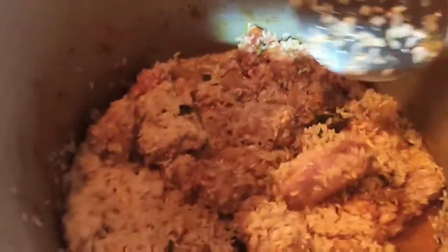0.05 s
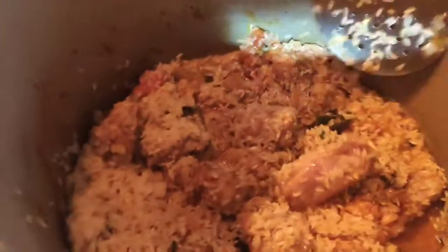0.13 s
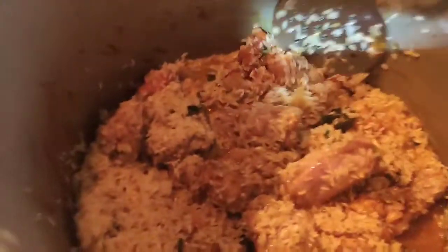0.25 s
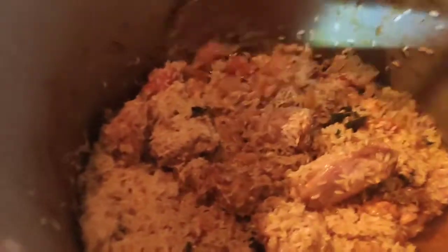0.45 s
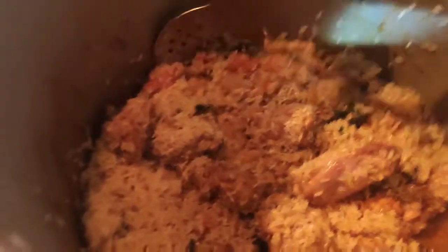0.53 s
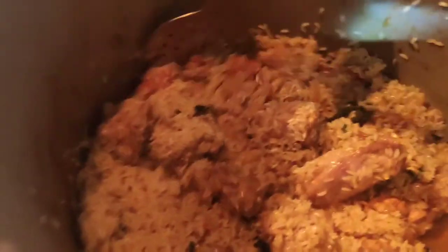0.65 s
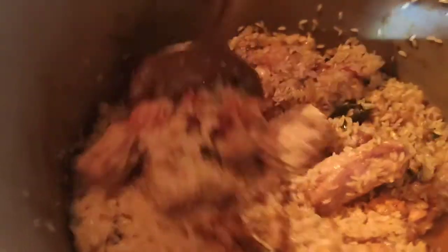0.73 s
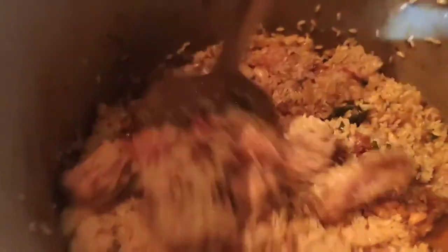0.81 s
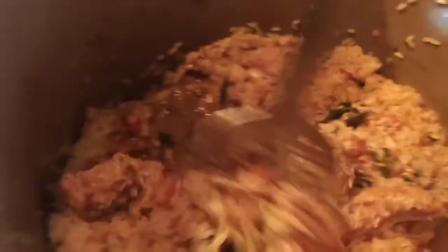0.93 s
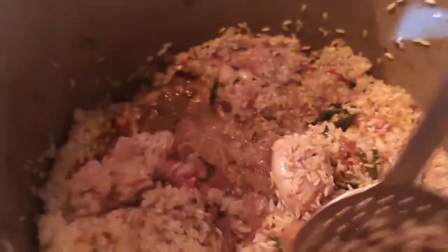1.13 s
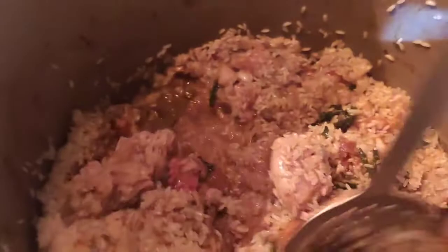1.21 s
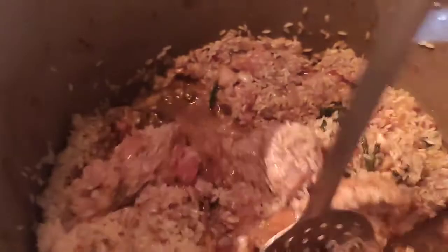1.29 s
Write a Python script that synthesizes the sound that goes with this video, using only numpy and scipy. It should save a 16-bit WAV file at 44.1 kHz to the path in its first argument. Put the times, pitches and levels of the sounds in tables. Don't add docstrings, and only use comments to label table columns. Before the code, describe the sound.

A steel ladle knocks a deep pot of rice, scrapes briefly along its wall, then knocks again and drags through the grains. Close stereo phone pickup in a quietly humming small kitchen.

```python
import sys
import numpy as np
from scipy import signal
from scipy.fft import rfft, irfft
from scipy.io import wavfile
from scipy.ndimage import uniform_filter1d, minimum_filter1d

SR = 44100
rng = np.random.default_rng(int(sys.argv[2]) if len(sys.argv) > 2 else 0)


def boost_factor(decibels):
    exponent = np.asarray(decibels, float) / 20
    return 10 ** exponent


def to_wav(sig):
    pcm = np.clip(np.atleast_2d(sig), -1, 1) * 32767
    pcm = np.round(pcm).astype(np.int16)
    wavfile.write(sys.argv[1], SR, pcm.T)


N = 59535
SIDES = np.array([[1], [-1]])


def rms_one(x):
    return x / np.sqrt(np.mean(x ** 2) + 1e-20)


def at_hz(points, hz):
    p = np.array(points)
    return np.interp(np.log(hz), np.log(p[:, 0] + 1), p[:, 1])


def highpass(x, order, hz):
    return signal.sosfilt(signal.butter(order, hz, "high", fs=SR, output="sos"), x)


def pan(x, db, lag_s=0):
    n = np.arange(N)
    left = np.interp(n - lag_s * SR, n, x)
    return np.array([left * boost_factor(db / 2), x * boost_factor(-db / 2)])


def drift(rate):
    r = np.exp(-80 * np.pi * rate / SR)
    slow = signal.lfilter([1], [1, -2 * r, r * r], rng.standard_normal(N // 40 + 2002))[2000:]
    return np.interp(np.arange(N) / 40, np.arange(len(slow)), rms_one(slow))


def ring(clicks, hz, t60):
    r = boost_factor(-60 / (max(t60, .005) * SR))
    w = 2 * np.pi * hz / SR
    return signal.lfilter([0, np.sin(w)], [1, -2 * r * np.cos(w), r * r], clicks + 1e-18)


def grains(per_s, spread):
    size = boost_factor(spread * np.minimum(rng.exponential(1, N), 4)) * rng.choice([-1, 1], N)
    return rms_one(size * (rng.random(N) < per_s / SR))


def bands(sources, spectrum, shape):
    edges = 25 * 2 ** np.arange(0, 9.6, .5)
    out = 0
    for k, (low, high) in enumerate(zip(edges, edges[1:])):
        hz = np.sqrt(low * high)
        bandpass = signal.butter(2, [low, high], "band", fs=SR, output="sos")
        band = signal.sosfilt(bandpass, sources[k % 2])
        out = out + boost_factor(at_hz(spectrum, hz)) * shape(band, hz)
    return out


def unchanged(band, hz):
    return band


def forest(x, depth_db):
    spacing_hz = 75
    hz = np.arange(N // 2 + 1) * SR / N
    knots = rng.standard_normal(1000)
    peaks_db = depth_db * np.interp(hz / spacing_hz, np.arange(len(knots)), knots)
    return rms_one(irfft(rfft(x) * boost_factor(peaks_db), N))


# (frequency [Hz], density [dB per Hz])
HUM_SPECTRUM = [(15, -42), (25, 3), (75, -2), (193, -0.5), (246, -15), (665, -9), (761, -10), (3080, -22.5),
                (15500, -44.5)]
# (frequency [Hz], likeness [0-1])
HUM_COHERENCE = [(60, 0.063), (240, 0.74), (950, 0.21), (3770, 0.025), (15000, 0.0)]
# (frequency [Hz], left-right [dB])
HUM_BALANCE = [(60, -6), (240, -5), (950, 0.5), (3770, 9), (15000, -1)]


def kitchen_hum():
    level_db, patchy_db = -45.5, 3
    together = drift(5.5)

    def shape(band, hz):
        alike = at_hz(HUM_COHERENCE, hz)
        pair = np.sqrt(1 + alike) * band[0] + np.sqrt(1 - alike) * band[1] * SIDES
        wander_db = patchy_db * (0.74 * together + drift(13.0))
        return pair * boost_factor(wander_db + at_hz(HUM_BALANCE, hz) * SIDES / 2)

    noise = forest(rng.standard_normal((2, 2, N)), 5.5)
    return boost_factor(level_db) * rms_one(bands(noise, HUM_SPECTRUM, shape))


# (frequency [Hz], bandwidth [Hz], level [dB])
HOLLOWS = [(90.2, 12, -55.5), (139.3, 20.5, -56.5), (276, 22.5, -60.5), (367.5, 34, -60.5),
           (704, 22, -58.5), (3160, 600, -63)]


def hollow_rings():
    out = 0
    for hz, width_hz, db in HOLLOWS:
        mid, side = rms_one(ring(rng.standard_normal((2, N)), hz, 1.34 / width_hz))
        swell = boost_factor(db + 4.07 * drift(6.9))
        lean = boost_factor(at_hz(HUM_BALANCE, hz) * SIDES / 2)
        out = out + swell * (mid + 0.65 * side * SIDES) * lean
    return out


# (time [s], level [dB], left-right [dB])
SLIDE_PRESSURE = [(0, -63.5, -10), (.1, -69.5, 3), (.29, -63.5, -10), (0.309, -55, -19), (0.312, -39.5, 2),
                  (0.326, -40.5, 3), (0.35, -40.5, 23), (0.371, -49.5, 13), (.47, -58.5, 4.5),
                  (.52, -56.5, 9), (0.602, -60, 2), (0.692, -74.5, -5), (0.932, -62, 10),
                  (1.003, -43.5, 12.5), (1.068, -61, 19.5), (1.134, -64, 5.5), (1.25, -63, 14.5),
                  (1.35, -64.5, 12)]


def slide_pressure():
    s, db, lr = np.transpose(SLIDE_PRESSURE)
    t = np.arange(N) / SR
    press = boost_factor(np.interp(t, s, db) + 1.04 * drift(46))
    return press, boost_factor(np.interp(t, s, lr) / 2)


# (frequency [Hz], first knock [dB], second knock [dB], slide [dB], t60 [s], left-right [dB])
LADLE_MODES = [(1980, -6, -10, -10.5, 0.14, -19), (2286, -30, 4, -1.5, 0.13, -8),
               (2410, -14, -3, -14, 0.24, -5), (2560, -20, -7, -5, 0.11, -4),
               (2586, -18, 7.5, -13, 0.17, -1), (2717, 5.5, 13.5, -2.5, 0.13, 13),
               (2910, -21, -32, -3.5, 0.05, 13), (2784, -21, 5.5, -8.5, 0.042, 21),
               (2885, -18, 14.5, -3.5, 0.086, 20.5), (2938, -8, -8.5, -27, 0.14, -43),
               (3186, 2, -28, -8.5, 0.12, 6), (3235, 2, -36, -5, 0.05, -17.5),
               (3530, 4, -24, -32, 0.018, -2), (3655, 10, 18, 1.5, 0.044, -11)]
# (frequency [Hz], first knock [dB], second knock [dB], slide [dB], t60 [s], left-right [dB])
POT_MODES = [(269.2, -3, -5.5, -11.5, 0.22, -5), (1028, -50, 4.5, -19, 0.017, 31),
             (1132, -39, 9, -50, 0.059, 9), (1654, 10, -38, -16, 0.025, -0.5),
             (4184, -1, -30, 1, 0.057, -6.5), (4270, -10, 7, -22, 0.09, -24),
             (4440, -2, -6, -12.5, 0.095, -20), (4690, -14, -21, 0, 0.099, -5),
             (5024, 2, 3.5, -8, 0.02, -40), (5280, -28, -2, -9, 0.086, 4), (5495, 2, 1, -6, 0.027, -31),
             (6000, -21, -15, -5, 0.018, -10), (6600, -26, 4, -9.5, 0.019, -34.5),
             (6988, 3, -22, -12, 0.014, -45.5)]


def sliding_ladle(slide, side):
    out = np.zeros((2, N))
    for hz, _, _, slide_db, t60, lr_db in [*LADLE_MODES, *POT_MODES]:
        mode = ring(slide, hz, t60 * 1.12) * boost_factor(slide_db - 26)
        out += pan(mode, lr_db, rng.uniform(0, 1) / hz) * [side, 1 / side]
    return out


# (frequency [Hz], density [dB per Hz])
CONTACT_SPECTRUM = [(450, -45), (750, -11), (1370, -13), (2610, 4), (3330, -0.5), (4310, 2), (6540, -15.5),
                    (7030, -14.5), (15500, -51)]


def rub(press):
    scrape = press * forest(np.array([grains(5000, spread=1.1), grains(8000, spread=2.5)]), 9)
    return boost_factor(16) * bands([scrape, scrape], CONTACT_SPECTRUM, unchanged)


def chatter(contacts, lag_s):
    fall_s, rise_s = 0.0014, 0.00023
    t = np.arange(N) / SR
    rattle = grains(6000, spread=4.62)
    out = 0
    for s, db, lr_db in contacts:
        click = 1.16 * np.maximum(1 - np.abs(t - s) * SR, 0)
        envelope = np.exp(-np.maximum(t - s, 0) / fall_s - np.maximum(s - t, 0) / rise_s)
        out = out + pan(boost_factor(db) * (click + rattle * envelope), lr_db, lag_s)
    return out


# (time [s], level [dB], left-right [dB])
FIRST_CONTACTS = [
    (0.2132, -25.5, 17),
    (0.2153, -10, -7),
    (0.2183, 0.5, -8.5),
    (0.221, 1, 17),
    (0.2239, -5.5, -6),
    (0.229, -11.5, 33),
    (0.239, -34, 14),
    (0.3137, -19.5, 0.5),
]
# (time [s], level [dB], left-right [dB])
SECOND_CONTACTS = [
    (.8830, -25.5, 17),
    (0.8859, -12, -12),
    (0.8879, -13, -11.5),
    (.8900, -3, -1),
    (0.8912, 5, 5),
    (0.8967, -7.5, -10),
    (0.904, -15, 1),
    (0.911, -44, -11),
]
FIRST_LAG_S, SECOND_LAG_S = 0.000496, -.0001


def knock_contacts():
    return [chatter(FIRST_CONTACTS, FIRST_LAG_S), chatter(SECOND_CONTACTS, SECOND_LAG_S)]


def ringing(full, blows, knock_levels):
    rice_db_per_s = 500
    t = np.arange(N) / SR
    gains = [boost_factor(db - rice_db_per_s * np.clip(t - s, 0, .03)) for db, _, s in knock_levels]
    out = np.zeros((2, N))
    for hz, first_db, second_db, _, t60, lr_db in [*LADLE_MODES, *POT_MODES]:
        drives = blows if hz > 850 else full
        for drive, mode_db, gain in zip(drives, (first_db, second_db), gains):
            out += ring(drive, hz, t60) * gain * boost_factor(mode_db - 15.0 + lr_db * SIDES / 2)
    return out


def crack(blow, white, spectrum, start_s):
    since = np.arange(N) / SR - start_s

    def tail(band, hz):
        t60 = 0.19 + 0.019 * 1000 / (hz + 1000)
        return band * (since > 0) * boost_factor(-17 - 60 * np.abs(since) / t60)

    return bands([blow, blow], spectrum, unchanged) + bands(white, spectrum, tail)


# (ring level [dB], crack level [dB], onset of rice damping [s])
KNOCK_LEVELS = [
    (-25, -11, 0.268),
    (-26, -10, 0.96),
]
# (frequency [Hz], density [dB per Hz])
SECOND_SPECTRUM = [(240, -38), (680, -33), (1050, -2), (2150, -24), (2880, -0.5), (5150, -0.5),
                   (5640, -8.5), (6280, -17), (15500, -34)]


def knocks(full):
    blows = highpass(full, 3, 850)
    out = ringing(full, blows, KNOCK_LEVELS)
    white = forest(rng.standard_normal((2, 2, N)), 9)
    spectra = (CONTACT_SPECTRUM, SECOND_SPECTRUM)
    starts = (FIRST_CONTACTS[-5][0], SECOND_CONTACTS[-5][0])
    for blow, (_, crack_db, _), spectrum, start_s in zip(blows, KNOCK_LEVELS, spectra, starts):
        out += boost_factor(crack_db + 21.5) * crack(blow, white, spectrum, start_s)
    return out


def walls(x):
    echo_t60_s, cut_hz = 0.18, 17000
    out, w = np.zeros((2, N)), np.arange(N + 1) * np.pi / N
    dull = 1 / (1 + 1j * w * SR / (2 * np.pi * cut_hz))
    for k, lag in enumerate(rng.uniform(.008, .035, 12)):
        loop = boost_factor(-60 * lag / echo_t60_s) * dull * np.exp(-1j * w * lag * SR)
        echoes = irfft(rfft(x[k % 2], 2 * N) * loop / (1 - loop))[:N]
        out[k % 2] += echoes * (-1) ** (k // 2)
    return out


def thump():
    jolt = (np.arange(N) == int(FIRST_CONTACTS[1][0] * SR)) * 1.0
    return pan(ring(jolt, 82, 0.0099) * boost_factor(-5), -24)


# (time [s], frequency [Hz], level [dB], contact [s], t60 [s], left-right [dB])
SLAP = (.8912, 2860, 8, .002, .02, 5)


def bowl_slap():
    s, hz, db, contact_s, t60, lr_db = SLAP
    since = np.maximum(np.arange(N) / SR - s, 0)
    build = 1 - np.exp(-(since / contact_s) ** 2)
    slap = build * boost_factor(db - 60 * since / t60) * np.sin(2 * np.pi * hz * since)
    return pan(slap, lr_db, SECOND_LAG_S)


# (time [s], frequency [Hz], level [dB], rise [s])
SCRAPE_TONE = (1.325, 925, -42, .02)


def scrape_onset():
    s, hz, db, rise_s = SCRAPE_TONE
    t = np.arange(N) / SR
    tone = np.clip((t - s) / rise_s, 0, 1) * np.sin(2 * np.pi * hz * t)
    return pan(tone * boost_factor(db), 0)


def scene():
    press, side = slide_pressure()
    slide = press * grains(3700, spread=4.24)
    contacts = knock_contacts()
    metal = sliding_ladle(slide, side) + knocks(contacts) + rub(press)
    near = highpass(metal, 4, 200)
    echoes = boost_factor(-22) * walls(near)
    return near + echoes + thump() + bowl_slap() + scrape_onset() + kitchen_hum() + hollow_rings()


def roll_off(x):
    return signal.sosfilt(signal.butter(12, 15630, fs=SR, output="sos"), x)


def record(dry):
    limit_db, share, ahead_s, release_db_per_s = -23, 0.34, 0.015, 276
    ahead = int(ahead_s * SR)
    ramp = release_db_per_s * np.arange(N) / SR
    level_db = 10 * np.log10(uniform_filter1d(np.max(dry ** 2, axis=0), size=88) + 1e-12)
    peak_db = -minimum_filter1d(-level_db, 2 * ahead + 1)
    held_db = np.maximum.accumulate(peak_db + ramp) - ramp
    cut_db = uniform_filter1d(share * np.maximum(held_db - limit_db, 0), size=66)
    mix = np.tanh(dry * boost_factor(-cut_db) / 1.041)
    return roll_off(mix)


dry = scene()
out = record(dry)
to_wav(out)
```